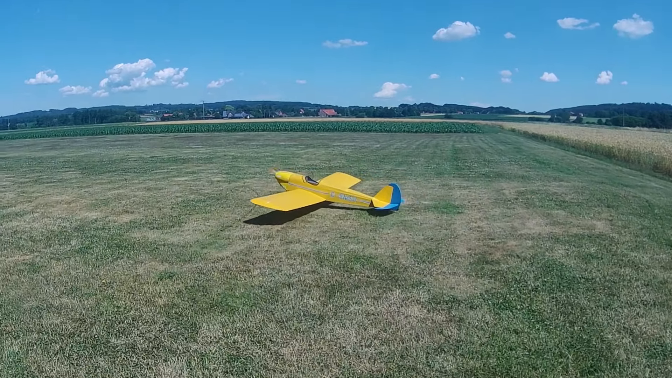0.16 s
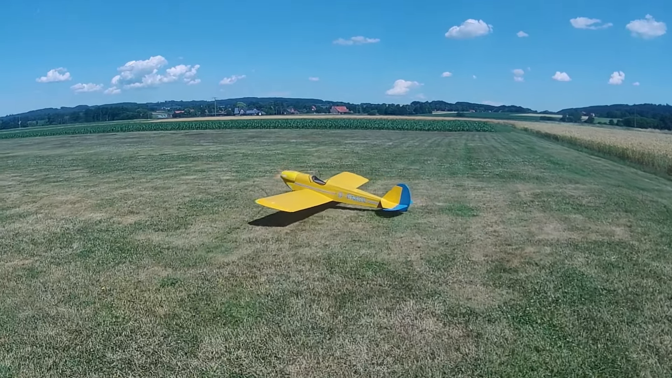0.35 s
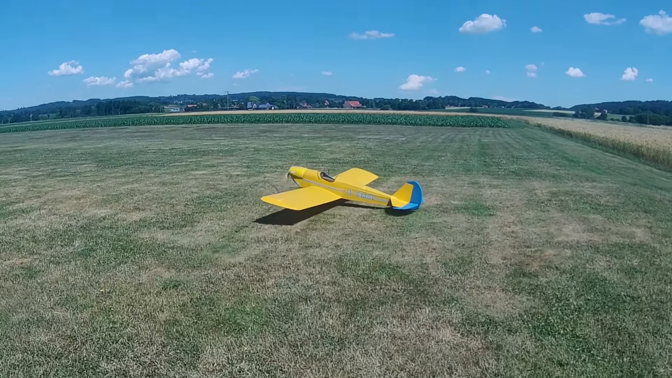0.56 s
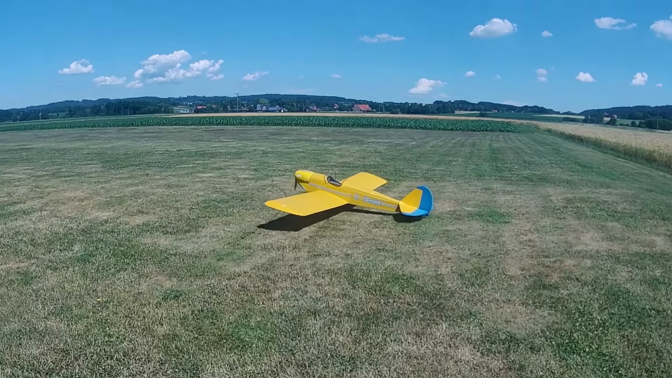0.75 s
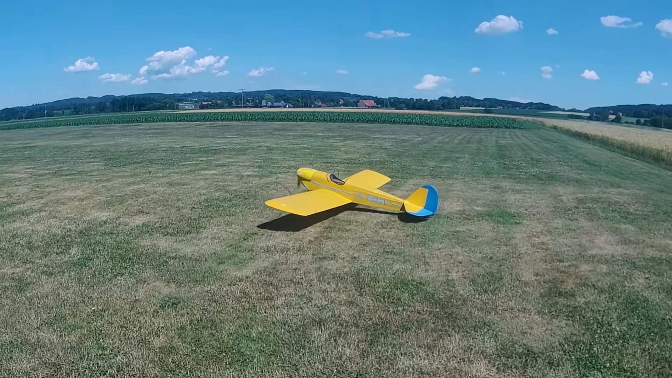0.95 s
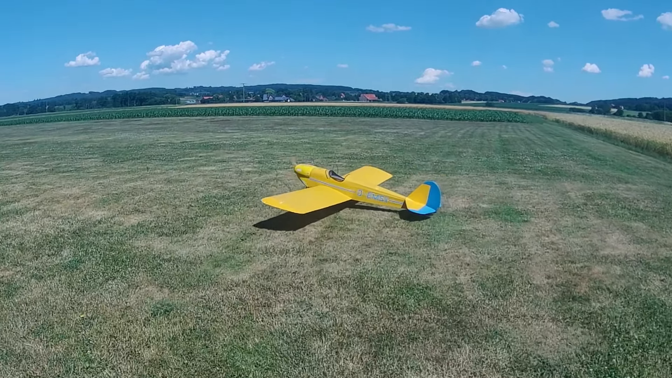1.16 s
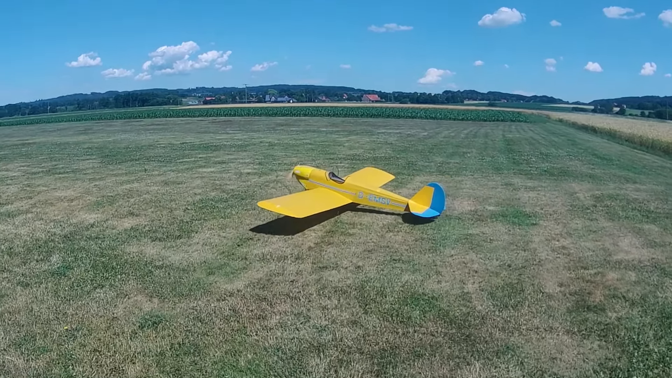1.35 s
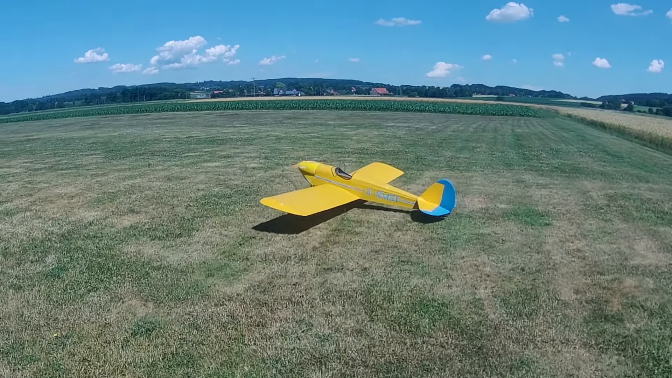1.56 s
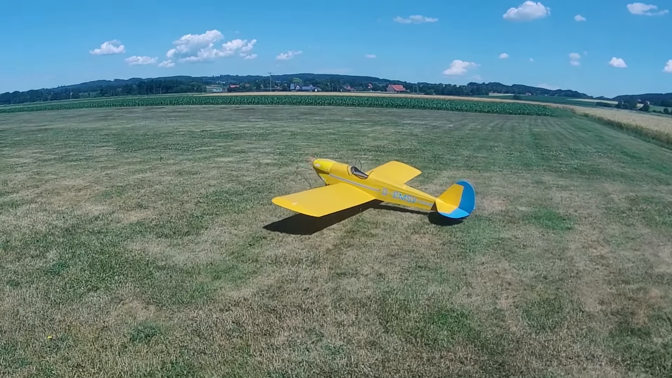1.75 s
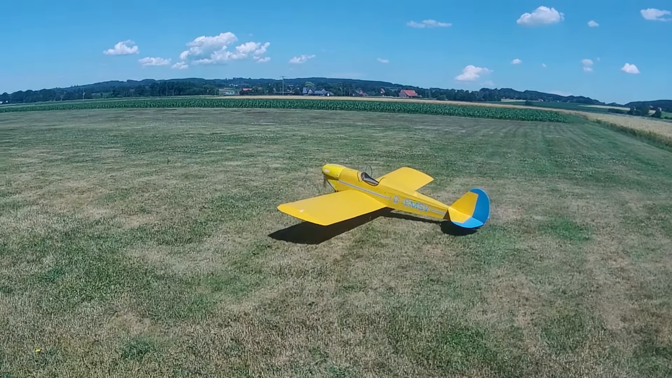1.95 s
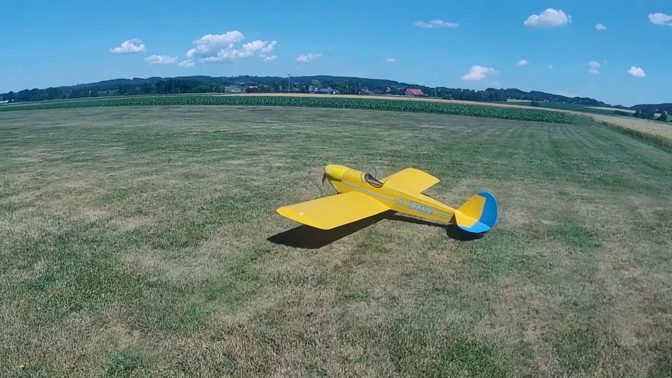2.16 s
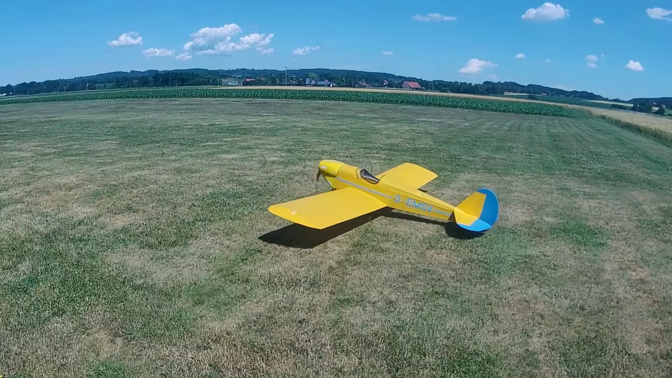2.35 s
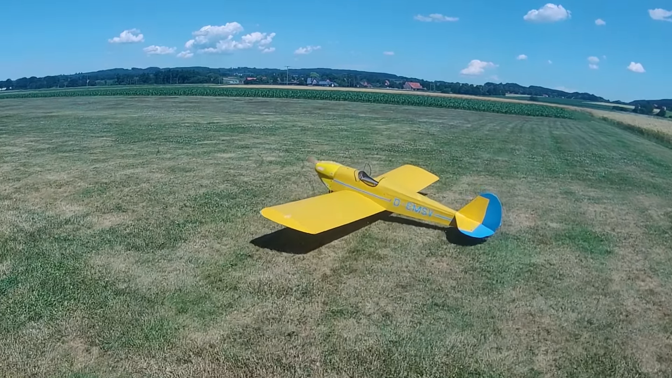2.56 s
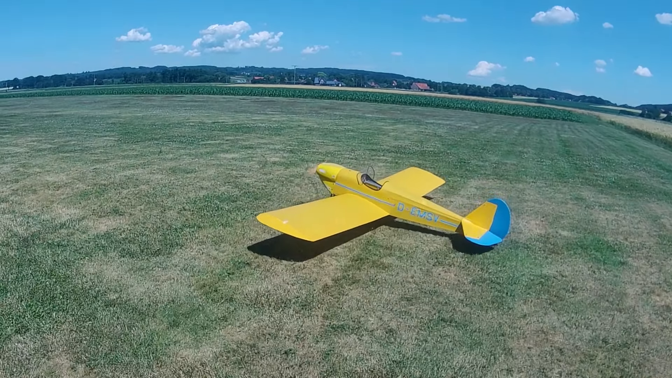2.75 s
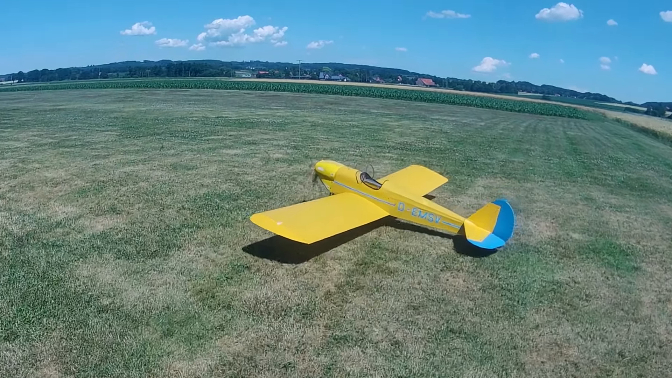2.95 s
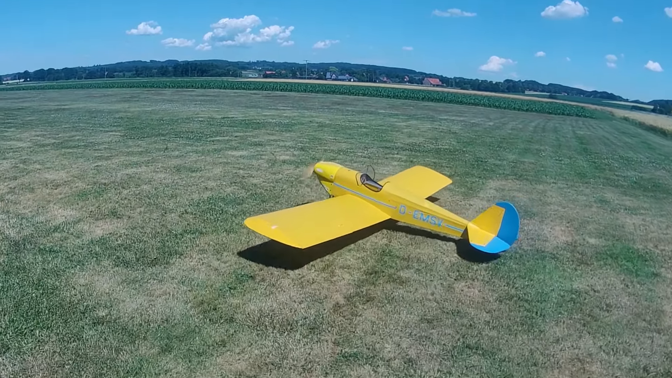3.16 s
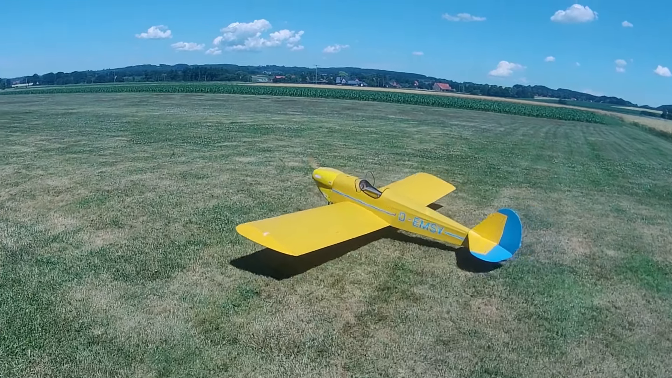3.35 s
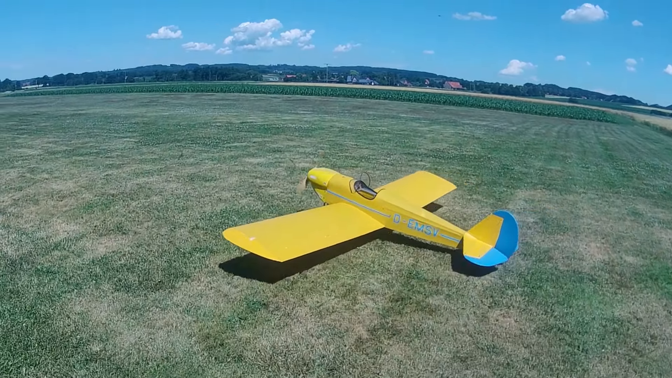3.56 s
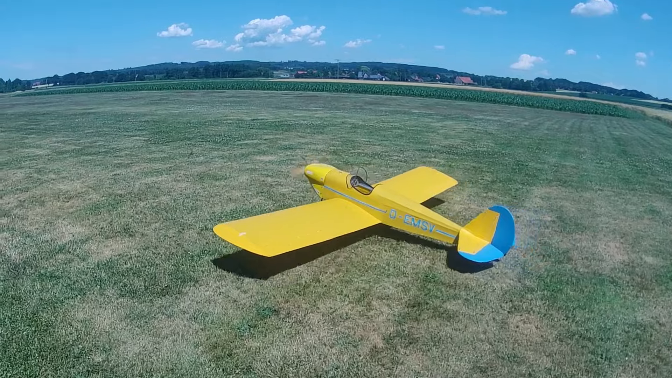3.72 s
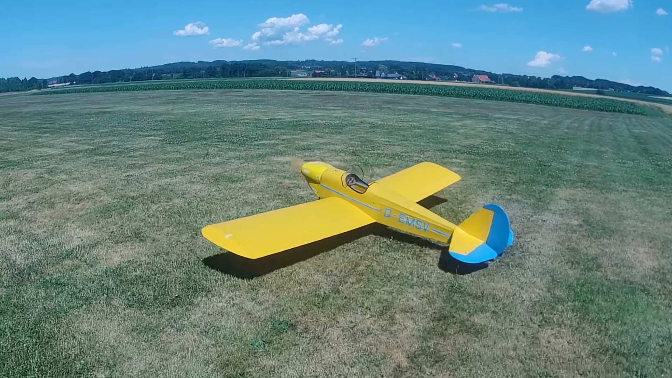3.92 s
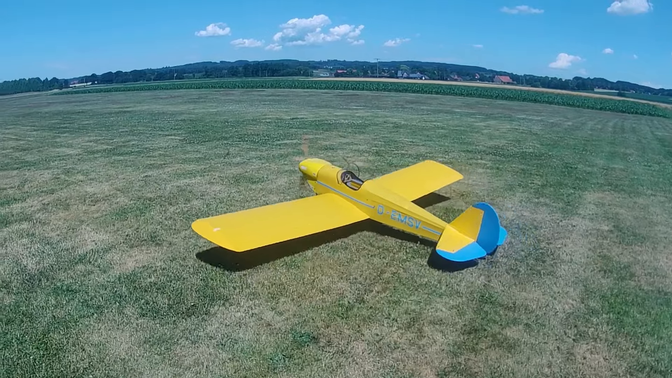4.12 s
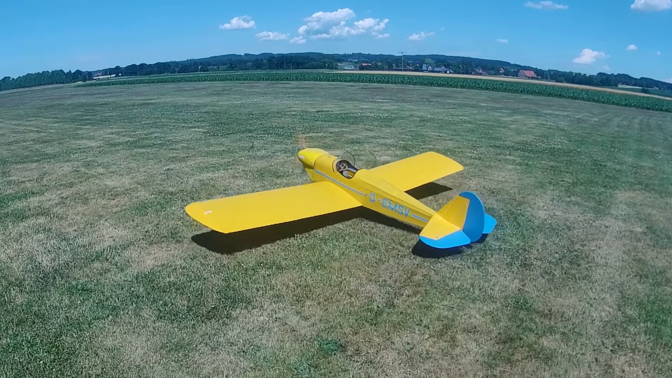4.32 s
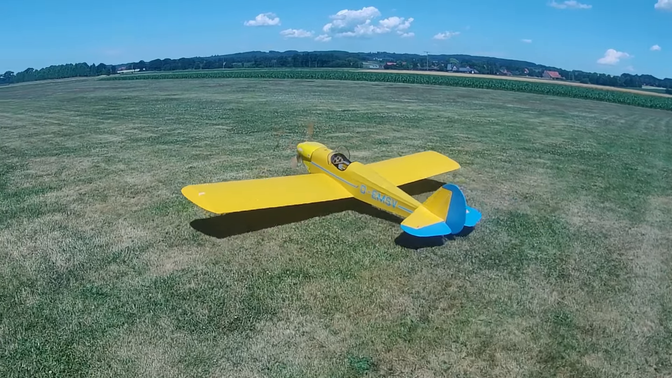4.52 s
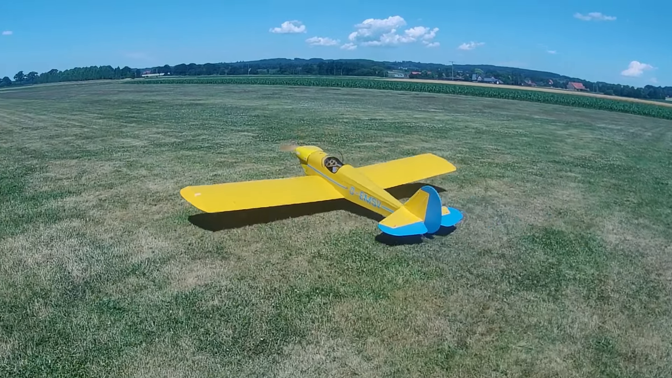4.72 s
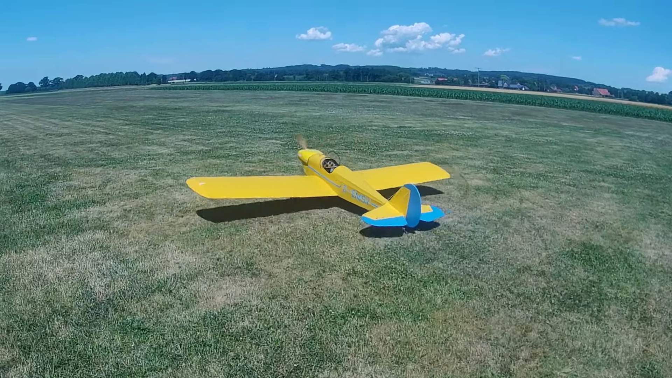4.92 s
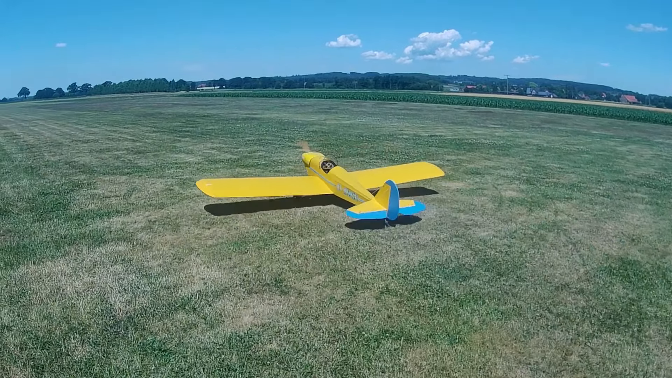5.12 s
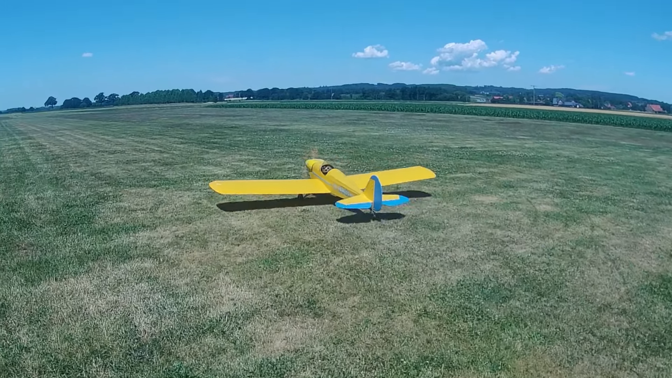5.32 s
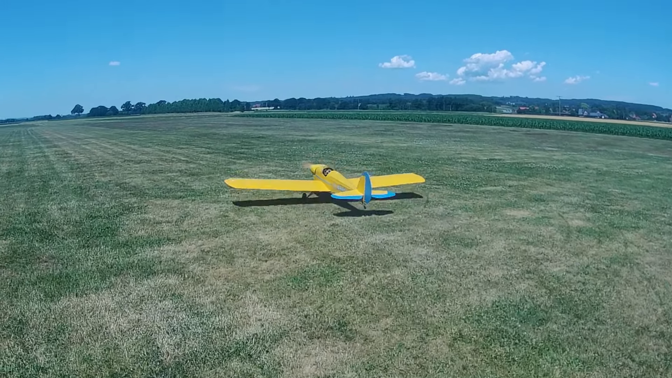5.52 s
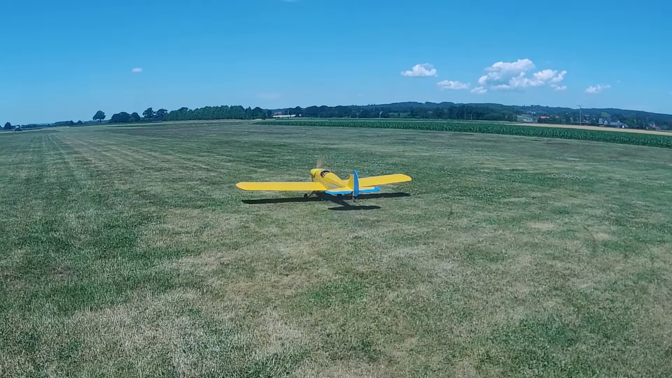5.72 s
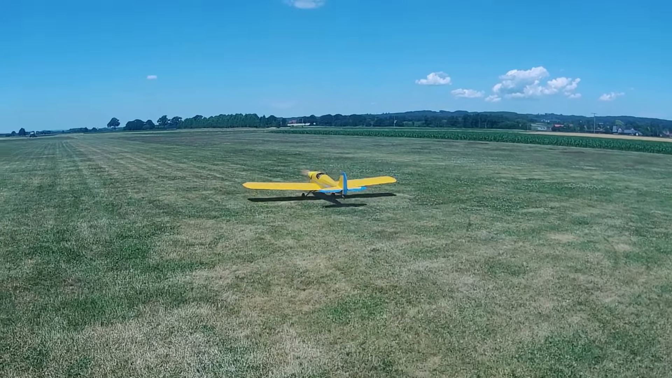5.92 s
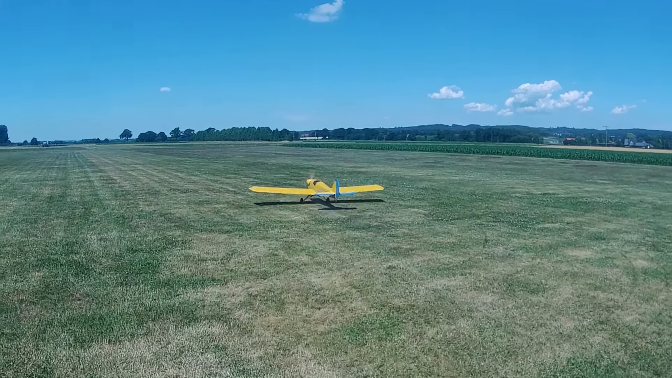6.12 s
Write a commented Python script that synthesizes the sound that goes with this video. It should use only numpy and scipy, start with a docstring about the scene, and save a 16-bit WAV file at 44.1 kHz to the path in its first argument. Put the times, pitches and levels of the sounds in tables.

```python
"""An unevenly idling single-cylinder two-stroke petrol engine comes nearer: a large model airplane on a mown field.
The throttle opens, the plane passes close by, turns its tail to the microphone and rolls away with a burst of power.
One shaft phase drives harmonic orders for the thump, growl and howl, and pulses that ring filters for the bark.
Noise gated once a turn makes the gas rasp and the blades' swish; decaying modes make knocks; open air, no echo."""
import sys
import numpy as np
from scipy import signal
from scipy.fft import rfft, irfft, next_fast_len
from scipy.io import wavfile
from scipy.ndimage import uniform_filter1d, map_coordinates

SR = 44100
rng = np.random.default_rng(int(sys.argv[2]) if len(sys.argv) > 2 else 0)


def unload_audio(sound):
    """Save the sound as a 16-bit wav file, at the path given as the first command line argument."""
    columns = np.transpose(np.atleast_2d(sound))
    # keep every value between -1 and 1, then stretch to whole-number steps
    steps = np.round(np.clip(columns, -1, 1) * 32767)
    wavfile.write(sys.argv[1], SR, steps.astype(np.int16))


N = 276948
IDLE_HZ = 42  # shaft speed at idle, turns per second
STEP = 8  # the growl and howl orders are computed on every eighth sample

# Shaft speed. Each row: time in seconds, speed in turns per second.
SHAFT_SPEED = [(0.0, 49.26), (0.33, 42.24), (0.6, 42.21), (1.52, 41.98), (1.64, 43.38), (2.54, 42.77),
               (2.67, 44.7), (2.75, 50.8), (2.88, 55.2), (3.0, 56.7), (3.29, 58.7), (3.48, 58.9),
               (3.82, 58.1), (3.89, 58.5), (4.02, 61.4), (4.1, 62.1), (4.33, 67.0), (4.41, 67.9),
               (4.73, 67.4), (4.98, 70.3), (5.12, 72.5), (5.31, 86.9), (5.38, 90.6), (5.43, 92.1),
               (5.72, 83.1), (5.85, 81.9), (6.17, 81.6), (6.28, 82.7)]
# Throttle opening. Each row: time in seconds, opening from 0 to 1.
THROTTLE_OPENING = [(0, 0.82), (.2, 0.2), (.45, 0.08), (1.4, 0.1), (2.62, 0.19), (2.85, 0.82), (3.5, 0.3),
                    (4.4, 0.56), (5.15, 0.44), (5.42, 0.72), (5.7, 0.42), (6.28, 0.2)]
# Range from the plane to the microphone. Each row: time in seconds, distance in metres.
PLANE_DISTANCE = [(0, 8.8), (1, 7.24), (2, 3.95), (3.1, 1.82), (4.3, 2), (5, 1.92), (5.6, 4.28),
                  (6.28, 7.4)]
# Heading as the plane swings round. Each row: time in seconds, tail turned to the listener from 0 to 1.
TAIL_TURN = [(4.4, 0), (5, 0.17), (5.3, 0.92), (6.28, 0.91)]
# Loudness laws of shaft orders 1 to 4. Each row: level in dB at 1 m when idling,
# dB added by full throttle, dB per octave of shaft speed, dB added from behind.
LOW_ORDER_LAWS = [(-36.5, 2.5, 14.5, -1.3), (-25, 11.5, 8.5, -19), (-24, 17, -21, 11),
                  (-26.5, 5, -11, 24.5)]


def amp(db):
    """Logarithmic level: decibels to amplitude gain."""
    return 10 ** (np.asarray(db) / 20)


def unit(x):
    """Normalisation by mean power: scale to rms 1."""
    return x / np.sqrt(np.mean(x ** 2) + 1e-20)


def curve(rows):
    """Linear interpolation: one value per sample from (seconds, value) rows."""
    return np.interp(np.arange(N) / SR, *np.transpose(rows))


def wobble(rate, size=1):
    """Band-limited fluctuation: spline through rate random knots a second, one value every size samples."""
    coarse = np.arange(0, N + 32, 32)
    knots = rng.standard_normal(int(N * rate / SR) + 4)
    smooth = map_coordinates(knots, [coarse * rate / SR])
    return np.interp(np.arange(0, N, size), coarse, smooth)


def coloured(x, points):
    """Minimum-phase filtering: a causal filter of unit energy with the (Hz, dB) shape."""
    size = 8192
    hz, db = np.transpose(points)
    bins = np.fft.rfftfreq(size, 1 / SR)
    gain = amp(np.interp(np.log(bins + 1), np.log(hz), db))
    # folding the cepstrum onto positive time makes the response causal
    cepstrum = irfft(np.log(gain))
    cepstrum[1:size // 2] *= 2
    cepstrum[size // 2 + 1:] = 0
    ring = irfft(np.exp(rfft(cepstrum)))
    return signal.fftconvolve(x, ring / np.linalg.norm(ring))[:N]


def blend(a, b, share):
    """Addition of powers: an equal-power cross-fade from a to b."""
    share = np.clip(share, 0, 1)
    return np.sqrt(1 - share) * a + np.sqrt(share) * b


def octaves():
    """Logarithmic frequency: shaft speed in octaves above idle."""
    return np.log2(curve(SHAFT_SPEED) / IDLE_HZ)


def loudness(law):
    """Spherical spreading: gain from throttle, speed and heading, inversely proportional to distance."""
    idle_db, throttle_db, octave_db, aft_db = law
    source_db = idle_db + throttle_db * curve(THROTTLE_OPENING)
    source_db = source_db + octave_db * octaves() + aft_db * curve(TAIL_TURN)
    return amp(source_db) / curve(PLANE_DISTANCE)


def roughness():
    """Turbulence against periodicity: the turbulent share falls as the throttle opens."""
    return np.clip(0.86 - 0.097 * curve(THROTTLE_OPENING), 0, 1)


def firing_strength(turns):
    """Cyclic variation of combustion: a weak firing leaves fuel behind, so the next tends to be strong."""
    # Misfires and hard firings. Each row: time in seconds, dB against neighbouring turns before smoothing.
    uneven_rows = [(.11, -12), (.22, 6.5), (.24, -6.5), (1.35, -8), (1.45, -12.5), (1.63, 5), (1.77, -5),
                   (1.82, -12.5), (1.865, -6), (1.885, 2), (1.94, 8), (2.03, 9), (2.145, -4.5), (2.24, 4),
                   (2.26, -16), (2.31, -12), (2.35, -11.5), (2.38, 3), (2.40, -4.5), (2.42, 6),
                   (2.45, -4.5), (2.70, -11.5), (3.36, -5.5), (3.40, -12), (3.48, 0.5), (3.58, -8),
                   (3.65, -8.5), (3.70, -8.5), (3.79, -2.5), (3.82, -12.5), (3.855, -5.5), (3.975, -3)]
    rebound = 0.22  # share of an excess or lack that the next firing reverses at closed throttle
    cycle = np.round(turns).astype(int)
    chance = np.tanh(rng.standard_normal(cycle[-1] + 2))
    uneven_db = np.zeros(len(chance))
    for s, db in uneven_rows:
        uneven_db[cycle[int(s * SR)]] = db
    rebound_db = -rebound * (1 - curve(THROTTLE_OPENING)) * uneven_db[cycle - 1]
    # weight of chance in each firing; its sign reverses as the tail turns
    scatter_db = -0.98 + 2.2 * curve(TAIL_TURN)
    alternation = 2 * chance[cycle + 1] - chance[cycle]
    gain = amp(uneven_db[cycle] + rebound_db + scatter_db * alternation)
    gain = uniform_filter1d(uniform_filter1d(gain, size=160), size=100)
    return gain / uniform_filter1d(gain, size=9000)


def puffs(turns, lead, decay, depth):
    """Amplitude-modulated turbulence: rms-1 noise bursts as the exhaust port opens and dies within the turn."""
    age = (turns + lead) % 1
    burst = unit((1 - np.exp(-age / 0.0038)) * np.exp(-age / decay))
    envelope = np.abs(blend(0.88, burst, depth))
    return unit(rng.standard_normal(N) * np.sqrt(envelope ** 2))


def port_pulses(turns, speed, lead, jitter):
    """Impulse-train excitation: one pulse per port opening, unit mean power, times scattered by rough running."""
    rough = roughness()
    at = np.interp(np.arange(1, int(turns[-1]) + 1) - lead, turns, np.arange(N))
    at += rng.standard_normal(len(at)) * jitter * SR * rough[at.astype(int)]
    pulses = np.bincount(np.clip(at, 0, N - 1).astype(int), minlength=N)
    return pulses * np.sqrt(SR / speed)


def smeared(x, spread):
    """All-pass dispersion: many short paths round the airframe spread each pulse but keep its colour."""
    t = np.arange(2048) / SR
    paths = rfft(rng.standard_normal(len(t)) * np.exp(-t / spread))
    lead = 200  # samples, removed again after the convolution
    response = np.roll(irfft(paths / np.abs(paths)), lead)
    return signal.fftconvolve(x, response)[lead:lead + N]


def background():
    """Broadband noise: a light breeze on the microphone fluctuates slowly over its steady hiss."""
    # Breeze colour. Each row: frequency in Hz, density in dB per Hz.
    breeze_colour = [(10, -15), (42, -2.5), (70, 15), (200, -19.5), (2000, -120)]
    # Hiss colour. Each row: frequency in Hz, density in dB per Hz.
    hiss_colour = [(100, 4), (2000, 1.5), (7000, 0), (16000, -.3)]
    gust_db = -50 + 2 * wobble(4) - 9 * curve(TAIL_TURN)
    breeze = coloured(rng.standard_normal(N), breeze_colour) * amp(gust_db)
    hiss = coloured(rng.standard_normal(N), hiss_colour) * amp(-68.2)
    return breeze + hiss


def wash():
    """Turbulent flow noise: the propeller's slipstream rumbles, rising with throttle and nearness."""
    # Slipstream colour. Each row: frequency in Hz, density in dB per Hz.
    wash_colour = [(10, -32.5), (35, -0.5), (55, -0.5), (100, 10), (150, 11.5), (200, 10), (400, -27.5),
                   (2000, -120)]
    # Loudness, in the columns of LOW_ORDER_LAWS.
    wash_law = (-23.5, 4, -1, -0.5)
    return coloured(rng.standard_normal(N), wash_colour) * loudness(wash_law) * amp(wobble(11.0))


def pings():
    """Modal decay: a hard firing knocks the engine's metal, whose modes ring briefly."""
    # Knocks. Each row: time in seconds, level in dB.
    knocks = [(2.2324, -53), (2.2783, -46.5), (2.3716, -54), (2.4189, -58), (2.4655, -43), (2.7163, -40),
              (2.795, -40), (3.067, -34), (3.1157, -33.5), (3.2191, -32), (3.3762, -33), (3.4098, -34.5),
              (3.546, -46), (3.63, -38.5), (3.664, -34), (3.714, -36), (3.8011, -36), (3.8354, -31.5),
              (3.8717, -35), (3.9534, -35.5)]
    # Modes of the metal. Each row: frequency in Hz, relative level in dB, time to decay by 60 dB in seconds.
    modes = [(1593, -4, 0.065), (1776, -10.5, 0.046), (2440, -18.5, 0.027), (2660, -15.5, 0.021),
             (3300, -17, 0.018), (4620, -25, .02)]
    out = np.zeros(N + SR)
    t = np.arange(SR // 20) / SR
    hz, mode_db, t60 = np.transpose(modes)[:, :, None]
    for s, db in knocks:
        level, phase = rng.standard_normal((2, len(hz), 1))
        decay = amp(db + mode_db + 2 * level - 60 * t / t60)
        ring = decay * np.sin(2 * np.pi * (hz * t + phase))
        out[int(s * SR):][:len(t)] += ring.sum(axis=0) * (1 - np.exp(-t / 0.00041))
    return out[:N]


def whine(turns):
    """Harmonic tones with amplitude modulation: single orders pulse with each turn, at idle and on leaving."""
    # Keyed by shaft order. Each row: time in seconds, level in dB.
    whine_levels = {14: [(.3, -82), (.65, -64), (1.05, -51), (1.5, -73), (2, -85)], 28: [(4.7, -100),
                    (5, -70), (5.5, -67), (5.8, -61), (5.95, -63), (6.1, -63), (6.28, -54)]}
    pulse = 1 + 0.6 * np.cos(2 * np.pi * (turns + .15))
    tones = np.zeros(N)
    for order, level_rows in whine_levels.items():
        level = amp(curve(level_rows) + 1.5 * wobble(22))
        tones += level * np.sin(2 * np.pi * order * turns + 0.017 * order * wobble(70))
    return pulse * tones


def chirp(turns):
    """Filtered impulses: from behind, each turn ticks; strong and weak alternate, with one stumble."""
    # Strong ticks from which the alternation is counted: times in seconds.
    strong_times = [5.703, 5.836]
    # Colour of the ticks. Each row: frequency in Hz, density in dB per Hz.
    tick_colour = [(2000, -40), (3100, -13), (3900, -20), (4350, -12), (4580, 0), (4850, 0), (5300, -17),
                   (6300, -18), (7300, -40)]
    # Level of the ticks. Each row: time in seconds, level in dB.
    tick_level = [(5, -80), (5.2, -65), (5.37, -58.5), (5.52, -63), (5.68, -59), (5.85, -59), (6.08, -66),
                  (6.28, -63.5)]
    weak_db = -7  # the ticks in between
    tick_turns = np.arange(int(turns[-1])) + .7
    strong = np.round(turns[(np.array(strong_times) * SR).astype(int)] - tick_turns[0])
    # an odd count from the nearest strong tick is weak
    weak = np.abs(np.arange(len(tick_turns))[:, None] - strong).min(axis=1) % 2
    size, late = rng.standard_normal((2, len(tick_turns)))
    at = np.interp(tick_turns, turns, np.arange(N)) + late * 0.00006 * SR
    ticks = np.bincount(np.clip(at, 0, N - 1).astype(int), amp(weak_db * weak + 2 * size), N)
    ticks /= np.sqrt(np.abs(uniform_filter1d(ticks ** 2, size=9000)) + 1e-12)
    return coloured(ticks, tick_colour) * amp(curve(tick_level))


def swish(turns):
    """Rotating directivity: each of two blades hisses once a turn; from behind one dominates and whistles."""
    # Colour from the side. Each row: frequency in Hz, density in dB per Hz.
    side_colour = [(1500, -40), (2600, -7), (3100, -0.5), (3500, 1), (4100, -4.5), (4750, -1.5), (5300, -8),
                   (6400, -12.5), (7200, -33), (14000, -93.5)]
    # Colour from behind. Each row: frequency in Hz, density in dB per Hz.
    aft_colour = [(1500, -44.5), (2700, -9), (3100, -2), (3600, -11.5), (4250, -12), (4550, 2.5), (4850, 0),
                  (5350, -13), (6450, -12), (7300, -35.5), (14000, -87)]
    # Level of the hiss. Each row: time in seconds, level in dB.
    swish_level = [(0.05, -74.5), (.8, -74.5), (2.2, -71), (2.63, -69.5), (2.9, -60.5), (3.1, -57.5),
                   (3.45, -60.5), (3.95, -61), (4.32, -55.5), (4.58, -62.5), (5.1, -62), (5.38, -58),
                   (5.68, -56.5), (5.9, -60), (6.1, -64), (6.28, -62)]
    # Each row, one blade: place in turns, width in turns, dB from the side; then the same from behind.
    blades = [(.78, 0.078, -0.5, .72, 0.11, -1.5), (.35, 0.18, -2.5, 0.3, 0.051, -5.5)]
    # Hiss between the blades: dB from the side, dB from behind.
    floor_db = (-4, -8)
    tail = np.clip(curve(TAIL_TURN), 0, 1)

    def between(side, aft):
        """Linear interpolation from the side view to the rear view."""
        return side + (aft - side) * tail

    power = amp(between(*floor_db)) ** 2
    for at, width, db, aft_at, aft_width, aft_db in blades:
        away = (turns - between(at, aft_at) + .5) % 1 - .5
        power += amp(between(db, aft_db)) ** 2 * np.exp(-(away / between(width, aft_width)) ** 2)
    envelope = np.sqrt(power / uniform_filter1d(power, size=6000))
    air = unit(rng.standard_normal(N) * envelope * amp(1.3 * wobble(110)))
    return blend(coloured(air, side_colour), coloured(air, aft_colour), tail) * amp(curve(swish_level))


def rasp(turns, strength):
    """Pulsed jet noise: gas cracks out of the pipe as the exhaust port opens."""
    # Colour from the side. Each row: frequency in Hz, density in dB per Hz.
    side_colour = [(600, -65), (1500, -9.5), (1720, 4.5), (2030, 1), (2350, 1), (2650, -2.5), (3200, -12),
                   (7000, -60)]
    # Colour from behind. Each row: frequency in Hz, density in dB per Hz.
    aft_colour = [(600, -58.5), (1800, -9.5), (2100, -1), (2310, 2.5), (2480, -3), (2700, -4.5),
                  (3200, -14.5), (7000, -57.5)]
    # Level of the rasp. Each row: time in seconds, level in dB.
    rasp_level = [(0.05, -67), (.7, -70.5), (1.7, -70.5), (2.3, -67), (2.6, -65), (3.12, -53), (3.6, -57.5),
                  (4.3, -55), (4.85, -59.5), (5.15, -55), (5.6, -60.5), (5.95, -63), (6.28, -64.5)]
    gas = puffs(turns, lead=0.11, decay=0.33, depth=0.14)
    jet = unit(gas * strength ** 0.82 * amp(1.2 * wobble(110)))
    return blend(coloured(jet, side_colour), coloured(jet, aft_colour), curve(TAIL_TURN)) * amp(curve(rasp_level))


def idle_ring(turns, pulses, strength):
    """Resonance: at idle each firing rings two resonances of the muffler, which swell and fade on their own."""
    # Lower resonance. Each row: frequency in Hz, density in dB per Hz.
    lower_colour = [(500, -45.5), (690, -17), (780, 1.5), (830, -6.5), (880, 1), (950, -6.5), (1080, -20.5),
                    (2500, -70)]
    # Its level. Each row: time in seconds, level in dB.
    lower_level = [(.85, -70), (1.17, -50.5), (1.33, -64), (1.46, -54), (1.58, -64), (1.73, -44),
                   (1.88, -57), (2.08, -48.5), (2.3, -56), (2.8, -67)]
    # Upper resonance. Each row: frequency in Hz, density in dB per Hz.
    upper_colour = [(800, -45), (1170, -13), (1260, -6.5), (1325, 0.5), (1370, -11), (1450, -29.5),
                    (2500, -69)]
    # Its level. Each row: time in seconds, level in dB.
    upper_level = [(0, -55), (.25, -60.5), (.45, -63.5), (1.3, -61), (1.55, -54), (1.75, -61), (2, -56),
                   (2.2, -77)]
    gas = puffs(turns, lead=0.11, decay=0.3, depth=0.7)
    drive = blend(smeared(pulses, spread=0.0052), gas, share=0.39) * strength ** 0.25
    lower = unit(coloured(drive, lower_colour)) * amp(curve(lower_level))
    upper = unit(coloured(drive, upper_colour)) * amp(curve(upper_level))
    return lower + upper


def howl(turns, strength, count=22):
    """Phase dispersion of harmonics: pipe and propeller fuse into clean high orders, swept upward each turn."""
    # Colour nearby. Each row: frequency in Hz, level in dB.
    near_colour = [(400, -10.5), (460, -6), (540, -3), (635, -3), (730, 1), (810, 1.5), (870, -9),
                   (930, -20.5), (1010, -12.5), (1090, -22.5), (1190, -14.5), (1290, -26), (1450, -27.5),
                   (2000, -48.5)]
    # Colour from afar. Each row: frequency in Hz, level in dB.
    far_colour = [(400, -12), (490, -6), (575, -2.5), (655, -1.5), (817, -8.5), (900, -18.5), (980, -25),
                  (1065, -12.5), (1150, -16.5), (1230, -22), (1310, -24), (1390, -17.5), (1470, -17.5),
                  (1560, -39.5), (2000, -53.5)]
    # Overall level. Each row: time in seconds, level in dB.
    howl_level = [(3.8, -100), (4.2, -45.5), (4.6, -44), (5.05, -36), (5.17, -26.5), (5.34, -28),
                  (5.44, -25), (5.56, -28.5), (5.72, -28.5), (6.15, -34), (6.28, -36)]
    near_m, far_m = 4, 4.05  # distances where one colour gives way to the other
    sweep = .06  # lag in turns, times the order
    drift_db, drift_rate = 1.75, 7  # wavering of each order, knots a second
    speed, turns, wave = curve(SHAFT_SPEED)[::STEP], turns[::STEP], 0
    far = np.clip((curve(PLANE_DISTANCE)[::STEP] - near_m) / (far_m - near_m), 0, 1)
    for k in range(len(LOW_ORDER_LAWS) + 1, count):
        near_db = np.interp(k * speed, *np.transpose(near_colour))
        far_db = np.interp(k * speed, *np.transpose(far_colour))
        db = (1 - far) * near_db + far * far_db + drift_db * wobble(drift_rate, size=STEP)
        wave += amp(db) * np.sin(2 * np.pi * k * (turns - sweep * k))
    wave = signal.resample_poly(wave, STEP, 1)[:N]
    return np.sqrt(2) * wave * amp(curve(howl_level)) * strength ** 0.5


def growl(turns, strength, count=25):
    """Subharmonic modulation: wavering middle orders, with weaker strands halfway between from uneven firing."""
    # Colour of the orders. Each row: frequency in Hz, level in dB.
    growl_colour = [(200, -6), (290, -5.5), (355, 3), (410, 0.5), (470, -1), (540, -2), (630, -11.5),
                    (720, -6), (810, -2.5), (890, -3), (1050, -11), (1230, -10.5), (1450, -22.5),
                    (1700, -31)]
    # Loudness, in the columns of LOW_ORDER_LAWS.
    growl_law = (-46, -1.5, 18, -3)
    half_order_db = -11
    drift_db, drift_rate = 3.5, 6  # wavering of level, knots a second
    waver, waver_rate = .55, 16  # wavering of phase in radians, knots a second
    speed, turns, wave = curve(SHAFT_SPEED)[::STEP], turns[::STEP], 0
    for k in np.arange(len(LOW_ORDER_LAWS) + 1, count, .5):
        db = np.interp(k * speed, *np.transpose(growl_colour)) + half_order_db * (k % 1 > 0)
        db = db + drift_db * wobble(drift_rate, size=STEP)
        phase = 2 * np.pi * (k * turns + rng.random()) + waver * wobble(waver_rate, size=STEP)
        wave += amp(db) * np.sin(phase)
    wave = signal.resample_poly(wave, STEP, 1)[:N]
    return np.sqrt(2) * wave * loudness(growl_law) * strength ** 0.54


def bark(turns, pulses, strength):
    """Source and filter: the port's pulses, mixed with turbulence, ring muffler and airframe."""
    # Colour when idling. Each row: frequency in Hz, density in dB per Hz.
    idle_colour = [(150, -38), (240, 11.5), (300, 7.5), (350, 2), (410, -0.5), (455, 10), (510, -1),
                   (545, -8), (590, -11), (640, -21), (705, -9), (780, 0), (850, -4), (905, 3), (1100, -13),
                   (1310, -9.5), (1500, -25), (1590, -15), (1710, -13.5), (2100, -42), (2350, -25),
                   (2550, -40.5), (6000, -100)]
    # Colour under power from the side. Each row: frequency in Hz, density in dB per Hz.
    side_colour = [(185, -16.5), (265, 4), (355, 9), (420, 2.5), (475, 7.5), (630, 1.5), (780, 6.5),
                   (880, 1), (1090, -13), (1230, -5.5), (1450, -18), (1590, -9.5), (1900, -35),
                   (6000, -100)]
    # Colour from behind. Each row: frequency in Hz, density in dB per Hz.
    aft_colour = [(200, -16.5), (300, -1), (410, -5.5), (490, -8.5), (560, -1), (720, 1.5), (820, -0.5),
                  (905, -12.5), (1030, -14.5), (1160, -4.5), (1290, -16), (1440, -11.5), (1620, -30),
                  (2000, -41), (6000, -110)]
    # Loudness, in the columns of LOW_ORDER_LAWS.
    bark_law = (-29, -7, 15.5, 0)
    churn = puffs(turns, lead=0.052, decay=1.0, depth=0.52) * amp(1.4 * wobble(130))
    # turbulence is weak in the low bark, so the lines there stay clean
    churn = signal.lfilter(*signal.butter(1, 550, "high", fs=SR), churn)
    ring = smeared(pulses, spread=.009)
    drive = blend(ring, churn, roughness()) * strength ** 0.26
    openness = 0.22 + 1 * octaves()  # share of the power colour, rising with speed
    side = blend(coloured(drive, idle_colour), coloured(drive, side_colour), openness)
    voice = blend(side, coloured(drive, aft_colour), curve(TAIL_TURN))
    voice /= np.sqrt(np.abs(uniform_filter1d(voice ** 2, size=9000)))
    return voice * loudness(bark_law)


def thump(turns, strength):
    """Fourier synthesis: low orders add to one push and pull of air a turn; from behind they fall out of step."""
    # Level of the two lowest orders as the plane passes and swings round. Each row: time in seconds, level in dB.
    swing_rows = [(0, 4), (2.55, -3.5), (2.85, -3.5), (3.1, -2), (3.4, 2), (4.2, -0.5), (5, 0), (5.17, 5.5),
                  (5.27, -3.5), (5.35, 5), (5.52, 6), (5.64, 0), (6.28, 3.5)]
    # the muffler's low resonance lifts each order that passes through it
    boom_hz, boom_half_width_hz, boom_peak_db = 188.3, 29.5, 10
    # each order wavers on its own as the plane rocks over the grass
    drift_db, drift_rate = 1.27, 6  # dB, knots a second
    slip = .2 * curve(TAIL_TURN)
    wave = np.zeros(N)
    for k, law in enumerate(LOW_ORDER_LAWS, start=1):
        detuning = (k * curve(SHAFT_SPEED) - boom_hz) / boom_half_width_hz
        boom_db = boom_peak_db / (1 + detuning ** 2)
        swing_db = curve(swing_rows) if k <= 2 else 0
        level = loudness(law) * amp(boom_db + swing_db + drift_db * wobble(drift_rate))
        wave -= level * np.sin(2 * np.pi * (k * turns - slip * (k - 2) ** 2))
    return np.sqrt(2) * wave * strength


def scene():
    """Superposition: one shaft phase drives the engine and blades; knocks, wash and background add to them."""
    speed = curve(SHAFT_SPEED)
    # the shaft never turns quite evenly, which roughens the high orders
    turns = np.cumsum(speed) / SR - .1 + .0025 * wobble(30)
    strength = firing_strength(turns)
    pulses = port_pulses(turns, speed, lead=0.1471, jitter=0.000095)
    surroundings = background() + wash()
    details = pings() + whine(turns) + chirp(turns) + swish(turns)
    exhaust = rasp(turns, strength) + idle_ring(turns, pulses, strength) + bark(turns, pulses, strength)
    orders = howl(turns, strength) + growl(turns, strength) + thump(turns, strength)
    return (surroundings + details + exhaust + orders)[None]


def record(dry):
    """Band limitation: nothing remains above the upper cut-off frequency."""
    top_hz = 15750
    m = next_fast_len(N + SR // 2)
    kept = np.fft.rfftfreq(m, 1 / SR) < top_hz
    return irfft(rfft(dry, m) * kept, m)[..., :N]


dry = scene()
out = record(dry)
unload_audio(out)
```